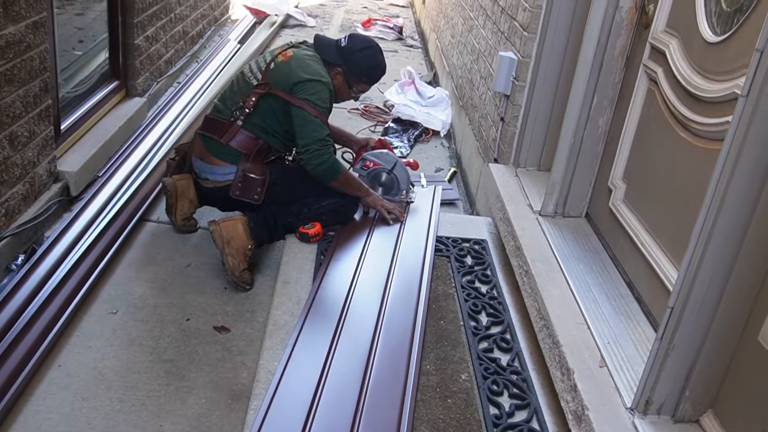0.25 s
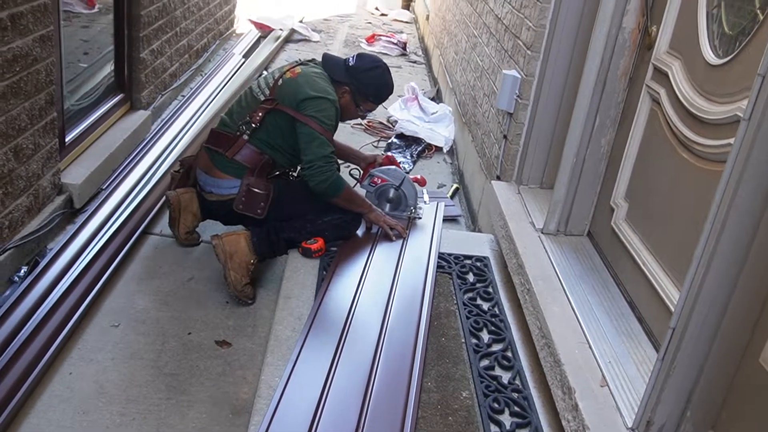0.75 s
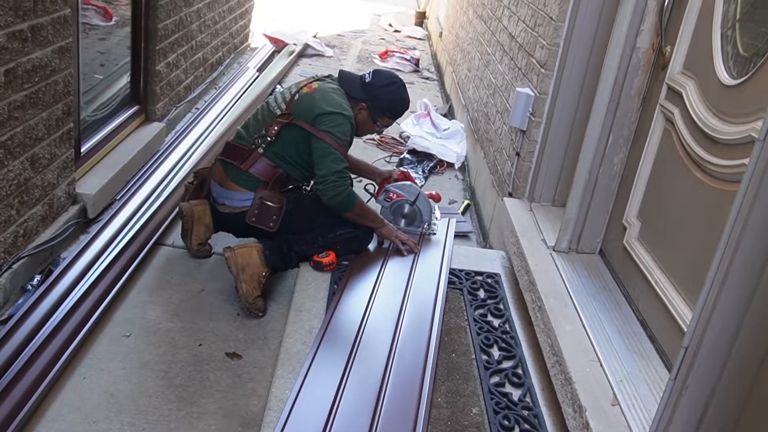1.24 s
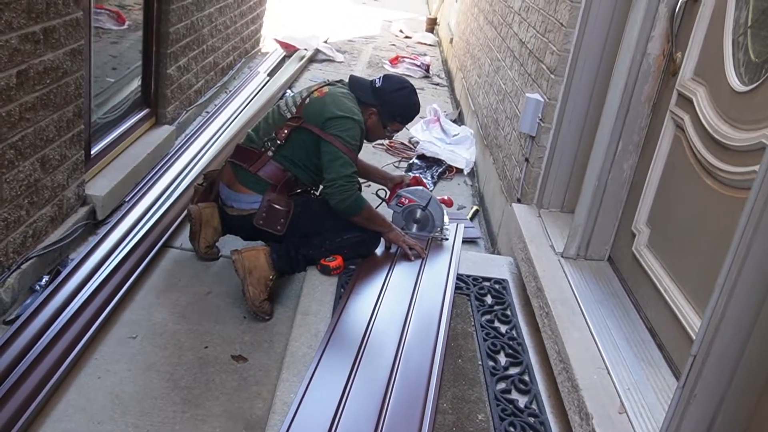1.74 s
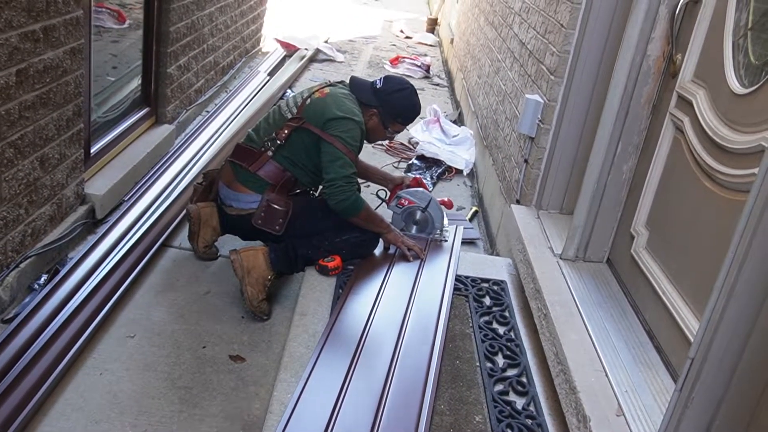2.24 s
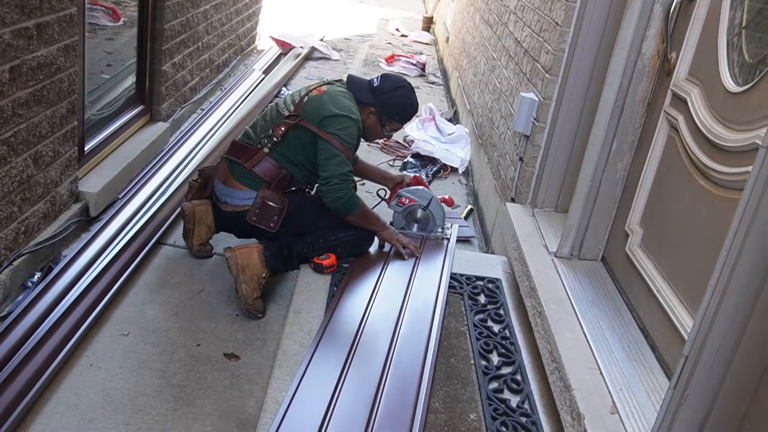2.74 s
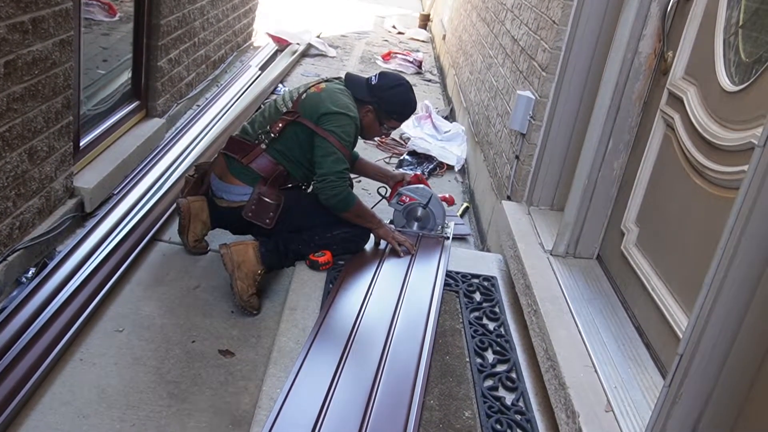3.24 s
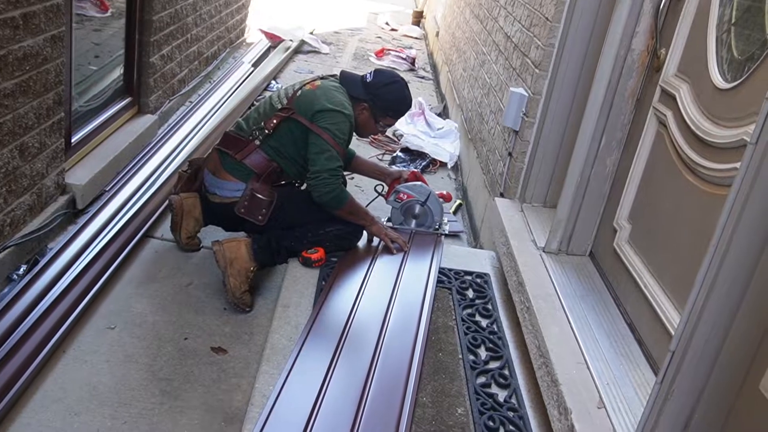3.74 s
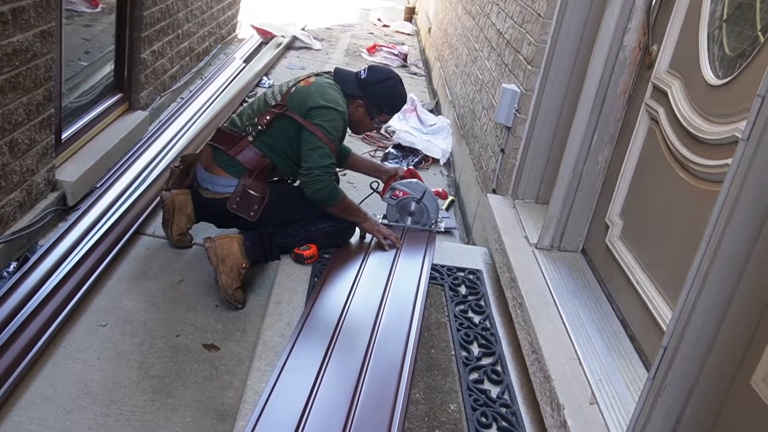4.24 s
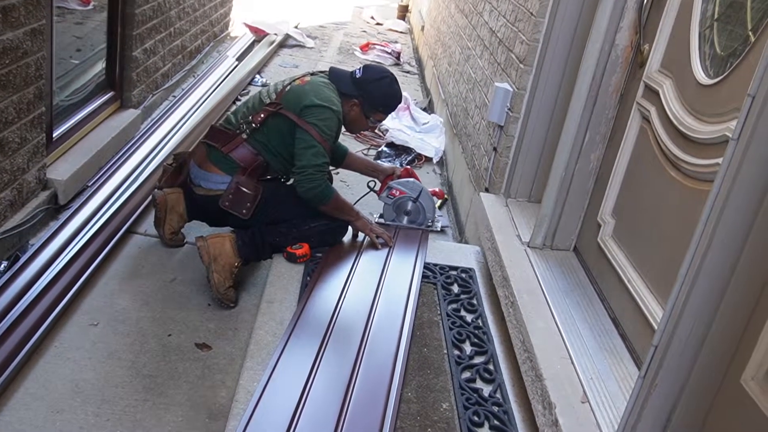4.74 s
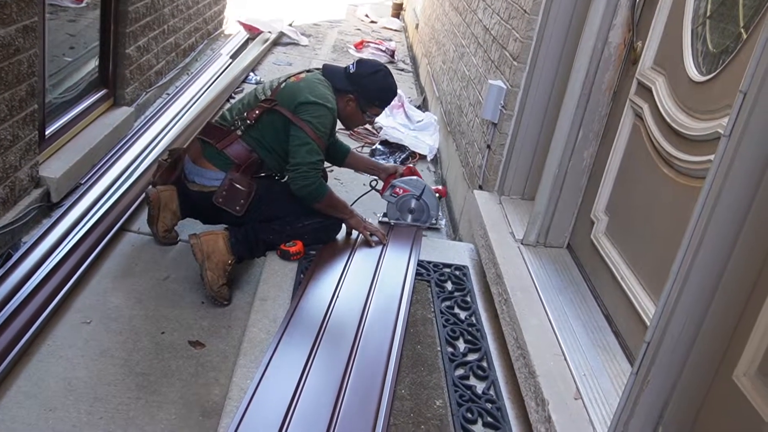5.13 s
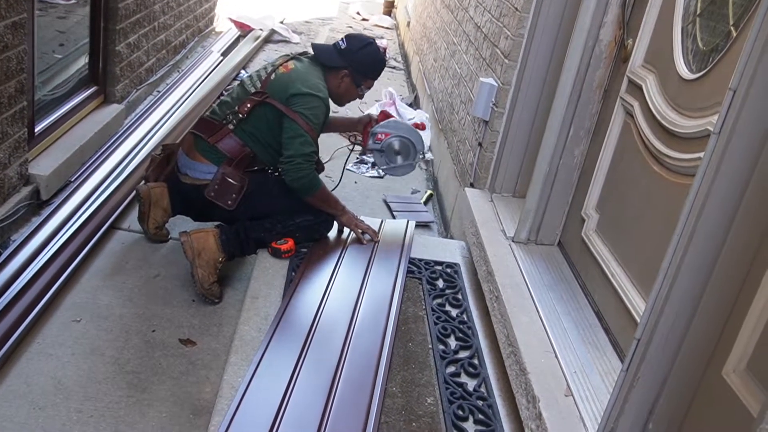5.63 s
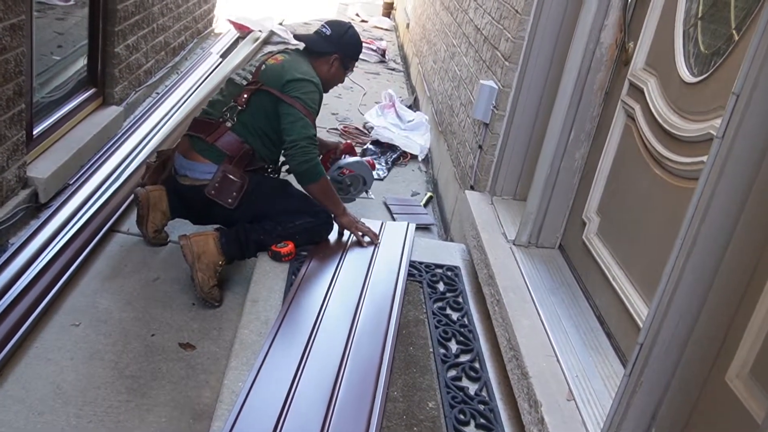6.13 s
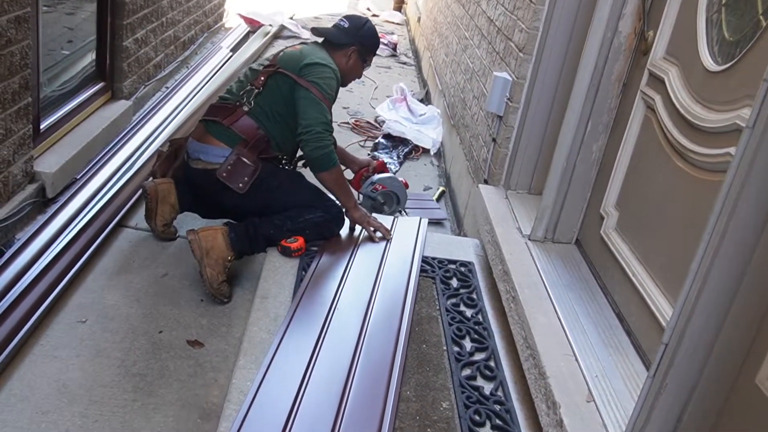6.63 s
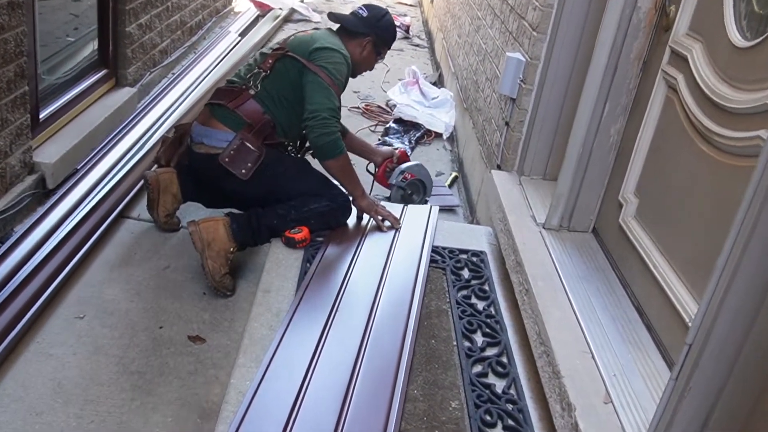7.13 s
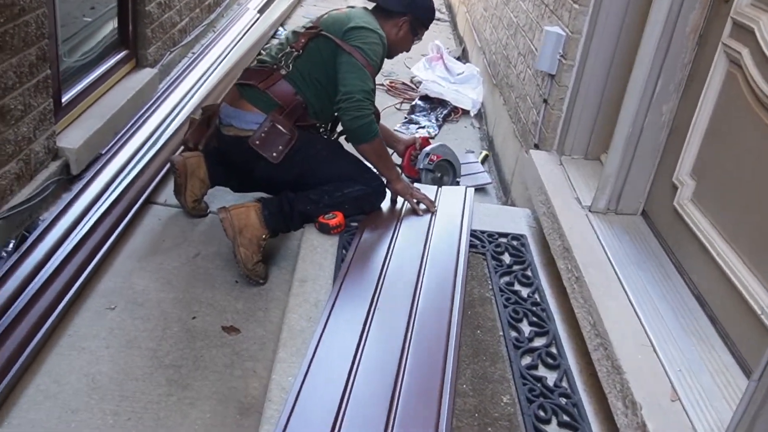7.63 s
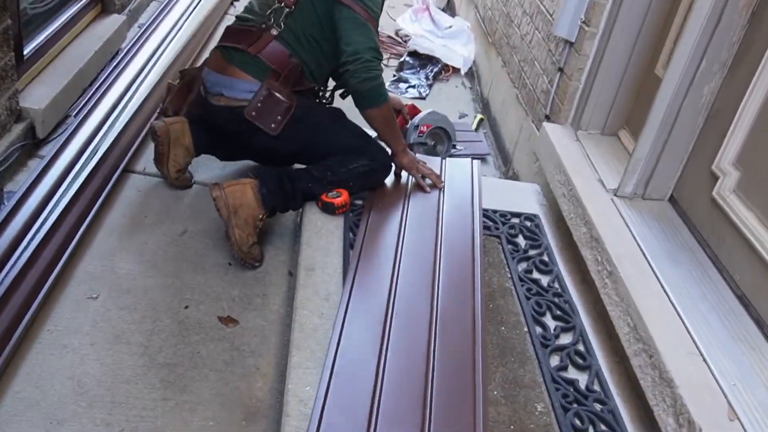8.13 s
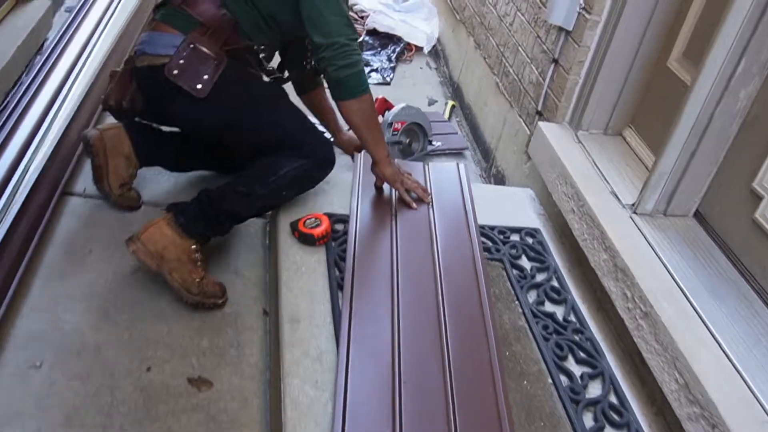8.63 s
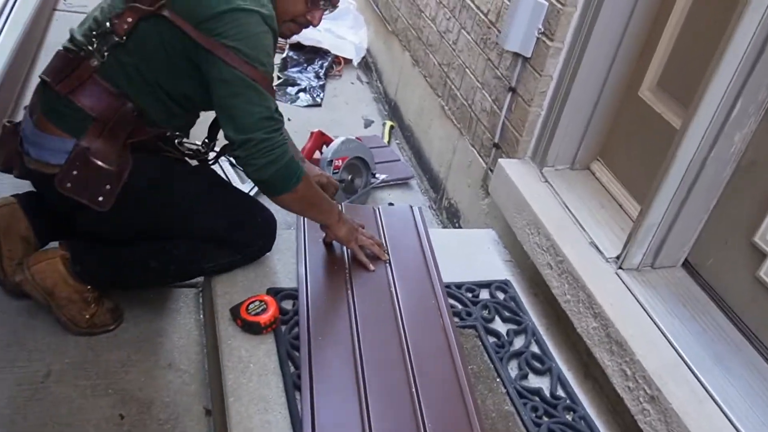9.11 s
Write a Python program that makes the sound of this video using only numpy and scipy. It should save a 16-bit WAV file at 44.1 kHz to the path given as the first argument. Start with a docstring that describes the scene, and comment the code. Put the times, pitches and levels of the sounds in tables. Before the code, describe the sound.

High, steady power saw whine with short crackly cuts into an aluminium panel, followed by a long, rattling wind-down.

```python
"""Circular saw on aluminium

A hand-held saw trims a panel on the ground in a narrow brick passage. Its gears whine over the rush
of the blade; the teeth crackle through the thin sheet, which thumps as it shifts. Then the trigger
is let go and the blade coasts down, the whine sinking and the slack gears rattling."""
import sys
import numpy as np
from scipy import signal
from scipy.fft import rfft, irfft, next_fast_len
from scipy.io import wavfile
from scipy.ndimage import uniform_filter1d, minimum_filter1d

SR = 44100
rng = np.random.default_rng(int(sys.argv[2]) if len(sys.argv) > 2 else 0)


def dump(signal):
    """Clip the signal to [-1, 1] and save it as 16-bit WAV at the path in sys.argv[1]."""
    limited = np.clip(np.atleast_2d(signal).T, -1, 1)
    pcm = np.round(limited * 32767).astype(np.int16)
    wavfile.write(sys.argv[1], SR, pcm)


N = 413207
TIME = np.arange(N) / SR
GEAR_TEETH = 70
RELEASE_S, COAST_S = 5.24, 5.36  # the motor lets go; the speed starts to fall
FRICTION_HZ_PER_S, DRAG_EVEN_HZ = 434, 3916  # air drag equals friction at DRAG_EVEN_HZ

# Table levels are relative; each layer sets its own gain.
# gear speed under power, sagging as the blade bites: time_s, mesh_hz
DRIVEN_SPEED = [(0, 4735), (.4, 4815), (1.35, 4838), (1.55, 4860), (1.85, 4860), (2.2, 4780), (2.5, 4520),
                (2.62, 4605), (2.8, 4640), (2.95, 4430), (3.1, 4445), (3.45, 4410), (3.8, 4595),
                (4.4, 4668), (4.7, 4628), (5.1, 4645), (5.3, 4844)]
# gear mesh tone under power: time_s, level_db
MESH_LEVEL = [(0, -21), (.3, -29.5), (1.3, -22.5), (2.3, -29), (3, -34.5), (3.7, -36), (4, -26), (4.3, -35),
              (4.6, -29), (5, -36), (5.25, -26)]
# its shrill octave: time_s, level_db
OCTAVE_LEVEL = [(0, -20), (.4, -24), (.8, -57), (1.5, -15), (1.75, -21.5), (2.2, -13), (2.45, -28),
                (2.65, -17), (2.97, -47), (3.1, -8.5), (3.25, -26), (3.45, -30), (3.75, -16.5), (4.05, -38),
                (4.5, -16.5), (4.8, -16), (5.2, -16)]
# gear case resonances the whine sweeps through: centre_hz, width_hz, lift_db
GEARCASE_MODES = [(14700, 250, 8), (4830, 35, -2), (4290, 64, 5), (4060, 210, 4.5), (3776, 72, 7),
                  (3540, 99, 7.5), (3280, 210, 2), (2980, 200, 3), (2520, 90, 3.5), (2222, 120, 11.5),
                  (1950, 20, 9)]
# stereo image, wider toward the treble: frequency_hz, correlation
STEREO_LIKENESS = [(30, .995), (250, .98), (600, .96), (1100, .985), (2600, .975), (4400, .92), (6000, .7),
                   (8000, .22), (15000, .18)]
# air moved by the running saw: time_s, rush_db, hiss_db
AIRFLOW = [(0.0, -18, -26), (0.62, -17.5, -25.5), (0.85, -17, -27.5), (1.13, -17.5, -26),
           (1.48, -20.5, -25.5), (1.77, -19, -25.5), (2.03, -20.5, -27.5), (2.48, -18.5, -29),
           (2.64, -21.5, -27), (2.87, -22.5, -30), (3.03, -20.5, -26.5), (3.27, -18.5, -25),
           (3.84, -18.5, -24), (4.1, -17, -25.5), (4.27, -17, -25), (4.5, -20, -26.5), (4.98, -20.5, -24),
           (5.2, -21, -28)]
# blade rush under power: frequency_hz, level_db
DRIVEN_RUSH_EQ = [(40, -87), (120, -38), (210, -15), (450, -12.5), (800, -4), (1600, -3.5), (3000, 0.5),
                  (4200, 5.5), (5000, 4), (5900, -1), (8000, -4), (11000, -44), (16000, -46)]
# fan hiss: frequency_hz, level_db
FAN_HISS_EQ = [(5000, -20.5), (8000, 1.5), (10000, 6), (11000, 2.5), (13000, 2.5), (16000, -1)]
# sizzle round the gear octave: mesh_multiple, level_db
SIZZLE_ORDERS = [(1.6, -41), (1.76, -1), (1.83, 4), (1.9, 4), (2, 11), (2.08, 1), (2.2, -49), (2.4, -60)]
# small parts radiate bass poorly: frequency_hz, level_db
SMALL_PARTS_EQ = [(120, -19.5), (700, -7)]
# motor housing and blade resonances: centre_hz, width_hz, lift_db
HOUSING_MODES = [(796, 150, 1), (1404, 290, 4), (1953, 350, 3), (3200, 72, 5.5), (3640, 280, 1),
                 (4210, 170, 1), (4570, 79, -9), (6200, 72, 6.5), (6820, 110, 6), (7500, 80, 6),
                 (8530, 50, -1), (8800, 65, 7), (13300, 250, 0)]
# narrow noise bands: saw and panel singing, and in the coast a rising colour from reflections as the saw moves:
# start_s, end_s, pitch_hz, nominal_width_hz, level_db
RINGS = [(-.2, 0.604, 396, 23, -43), (-.2, .9, 2797, 49, -31), (.4, 1.5, 2004, 130, -30),
         (.4, 1.45, 13300, 110, -36), (0.947, 1.423, 4200, 380, -23), (1.6, 2.304, 209.6, 5.6, -49),
         (2.36, 2.56, 4340, 200, -22), (3.0, 4.807, 272.4, 12, -50.5), (3.22, 3.5, 4490, 25, -23.5),
         (3.35, 3.62, 3700, 68, -22), (4.75, 5.09, 1170, 60, -31), (5.3, 5.85, 733, 120, -33.5),
         (5.65, 6.205, 803, 66, -31), (6.9, 8.105, 852, 59, -36.5), (7.7, 9.203, 944, 46, -37),
         (7.5, 9.5, 214, 15, -44), (8.76, 9.18, 1380, 50, -24.5), (8.849, 9.407, 3770, 80, -31)]
# background rumble: time_s, level_db
RUMBLE_LEVEL = [(0, -70), (5.7, -63), (7.6, -44), (8.3, -46.5), (9.37, -36)]
# its dark street tone: frequency_hz, level_db
RUMBLE_EQ = [(25, -9), (65, 2.5), (120, -2), (220, 3), (500, 2), (1200, -38)]
# the panel is bumped and shifted: start_s, level_db, decay_s
BUMPS = [(1.077, -26.5, 0.081), (1.358, -25, 0.088), (1.509, -23, 0.055), (3.71, -28, 0.068),
         (4.118, -24, .046), (4.527, -22.5, 0.028), (5.031, -22.5, 0.021), (6.428, -30, 0.14),
         (7.709, -28.5, 0.2), (8.222, -24, 0.066), (8.775, -22.5, 0.074), (9.275, -22.5, .084),
         (9.323, -22, .05)]
# its dull thump: frequency_hz, level_db
THUMP_EQ = [(30, -23), (70, -13), (140, -3), (240, 3), (400, -1), (700, -3.5), (1500, -15.5), (4000, -48)]
# the blade bites into the sheet: start_s, length_s, depth_db
BITES = [(1.356, 0.34, -30), (2.284, 0.089, -22.5), (2.427, 0.11, -19), (2.628, 0.14, -17.5),
         (2.813, 0.2, -13.5), (3.194, 0.16, -24.5), (2.982, .62, -30.5)]
# single teeth snag: time_s, strength_db
SNAGS = [(1.389, -12), (1.519, -15), (1.576, -11), (2.288, -9), (2.42, -10), (2.531, -26), (2.545, -15),
         (2.634, -3), (2.743, -8), (2.759, -6), (2.788, -9), (2.819, -27), (3.005, -12), (3.023, -4),
         (3.194, -5), (3.354, -11)]
# crackle of the thin sheet: frequency_hz, level_db
CRACKLE_EQ = [(21, -48), (35, -15), (155, 0), (325, 1.5), (414, 2.5), (493, 2), (797, 2.5), (992, 3),
              (2650, 1), (3760, -2.5), (4290, -5.5), (6500, -67), (8450, -47), (14300, -120)]
# rattle of the slack gears: time_s, level_db
RATTLE_LEVEL = [(5.4, -18), (5.56, -13.5), (5.96, -14.5), (8.28, -13.5), (9.37, -20)]
# its colour, tracking the speed: mesh_multiple, level_db
RATTLE_ORDERS = [(.15, -17.5), (.4, -23), (.62, -8), (.82, 0.5), (.95, -2), (1.12, -8.5), (1.9, -10.5),
                 (2.4, -42)]
# blade and guard resonances: centre_hz, width_hz, lift_db
BLADE_MODES = [(947, 140, 2.5), (1387, 120, 5.5), (2200, 510, 4), (3780, 430, 3.5), (5600, 80, -7),
               (6100, 130, 1.5), (6700, 140, 2), (7740, 40, 11.5), (8400, 130, 4), (15100, 400, 1)]
# rush of the coasting blade: frequency_hz, level_db
COAST_RUSH_EQ = [(30, -38), (120, -40), (210, -16), (450, -8.5), (800, 2), (1500, 5), (3000, 7.5),
                 (4500, 5), (6000, 4.5), (7200, -1.5), (8600, 3), (10300, -3), (13000, -6.5), (16000, -9.5)]
# narrow whistle two octaves above the mesh: mesh_multiple, level_db
WHISTLE_ORDERS = [(3.75, -20), (3.92, -31), (4, 22), (4.1, -33), (4.3, -7)]
# the blade's bright band, which brings out the sinking whistle: frequency_hz, level_db
BRIGHT_BAND_EQ = [(7000, -10), (7900, 0), (9900, -3), (10800, -14), (15000, -36)]
# one sharp little tick: start_s, level_db
TICK = [(8.104, -4)]
# its bright colour: frequency_hz, level_db
TICK_EQ = [(3000, -25), (8000, 2), (12000, 0), (16000, -10)]


def from_db(db):
    """Decibels to gain."""
    return 10 ** (np.asarray(db) / 20)


def rms_one(x):
    """Scale to unit power."""
    return x / np.sqrt(np.mean(x ** 2) + 1e-20)


def in_time(rows):
    """One automation curve for each column after the time."""
    times, *columns = np.transpose(rows)
    return [np.interp(TIME, times, column) for column in columns]


def at_hz(points, hz):
    """Read a curve on a log-frequency axis."""
    x, y = np.transpose(points)
    return np.interp(np.log(hz), np.log(x), y)


def lift_db(modes, hz):
    """What a set of resonances adds at a frequency."""
    return sum(lift / (1 + (2 * (hz - centre) / width) ** 2) for centre, width, lift in modes)


def drift(rate_hz):
    """Smooth random modulation of spread 1."""
    pole = np.exp(-80 * np.pi * rate_hz / SR)
    slow = signal.lfilter([1], [1, -2 * pole, pole * pole], rng.standard_normal(N // 40 + 2002))[2000:]
    return np.interp(np.arange(N) / 40, np.arange(len(slow)), rms_one(slow))


def white():
    """Two unrelated white noises."""
    return rng.standard_normal((2, N))


def coloured(pair, eq, modes=()):
    """Shape a mid and a side signal with EQ and resonances into left and right at unit power."""
    size = next_fast_len(N, real=True)
    hz = np.maximum(np.arange(size // 2 + 1) * SR / size, 1)
    alike = np.clip(at_hz(STEREO_LIKENESS, hz), 0, .999)
    mid, side = rfft(pair, size) * from_db(at_hz(eq, hz) + lift_db(modes, hz))
    side = side * np.sqrt((1 - alike) / (1 + alike))
    return rms_one(irfft([mid + side, mid - side], size)[:, :N])


def gear_speed():
    """Mesh rate in Hz: held up by the motor, then braked by even friction and square-law air drag."""
    driven, = in_time(DRIVEN_SPEED)
    start_angle = np.arctan(DRIVEN_SPEED[-1][1] / DRAG_EVEN_HZ)
    coasting = DRAG_EVEN_HZ * np.tan(start_angle - FRICTION_HZ_PER_S / DRAG_EVEN_HZ * (TIME - COAST_S))
    return np.where(TIME < COAST_S, driven, coasting)


def whine(mesh, order, level_db, flutter, wobble, apart):
    """One gear tone: it swings once a turn, and wall reflections make each side waver differently."""
    runout = wobble * np.sin(2 * np.pi * (mesh / GEAR_TEETH + rng.random()))
    jitter = 1 + flutter * (drift(20 * order) + 1j * drift(20 * order))  # widens the higher tones more
    sides = np.array([jitter + apart * (drift(4.5) + 1j * drift(0.71)) for _ in range(2)])
    tone = np.real(sides * (1 + runout) * np.exp(2j * np.pi * order * mesh))
    return from_db(level_db) * rms_one(tone)


def gears(mesh, mesh_hz, free):
    """Meshing teeth sing three harmonics: the octave leads under power, the lowest when coasting."""
    mesh_db, octave_db = in_time(MESH_LEVEL) + in_time(OCTAVE_LEVEL)
    driven_db = mesh_db, octave_db, octave_db - 19
    rise_db = 1.4 * (TIME - COAST_S)  # the overtones creep up through the coast
    coasting_db = -20.5 + 1.2 * drift(11), -33.5 + rise_db, -47 + rise_db
    first_db, second_db, third_db = (
        (1 - free) * driven + free * coasting + lift_db(GEARCASE_MODES, order * mesh_hz)
        for order, driven, coasting in zip((1, 2, 3), driven_db, coasting_db))
    blur = 1 + 3 * free  # slack teeth smear the overtones
    return (whine(mesh, order=1, level_db=first_db, flutter=.35, wobble=.25, apart=.12)
            + whine(mesh, order=2, level_db=second_db, flutter=.31 * blur, wobble=.2, apart=.5)
            + whine(mesh, order=3, level_db=third_db, flutter=.45 * blur, wobble=.35, apart=.5))


def tooth_buzz(turns, harmonics=215, size=4096):
    """Uneven teeth repeat one rough pattern on every turn of the blade: a comb of close lines."""
    lines = rng.standard_normal((2, harmonics)) + 1j * rng.standard_normal((2, harmonics))
    angle = np.arange(size) / size
    return rms_one(np.array([np.interp(turns, angle, cycle, period=1) for cycle in irfft(lines, size)]))


def geared_noise(mesh, orders, per_tooth=32):
    """Noise laid out along the rotation, so its colour rises and sinks with the speed."""
    length = next_fast_len(int(mesh[-1] * per_tooth) + 2, real=True)
    multiple = np.arange(1, length // 2 + 2) * per_tooth / length
    spectrum = rfft(rng.standard_normal((2, length))) * from_db(at_hz(orders, multiple))
    return np.array([np.interp(mesh * per_tooth, np.arange(length), n) for n in irfft(spectrum, length)])


def driven_saw(mesh, bite, throb=0.074):
    """Blade rush and fan hiss, partly locked to the rotation, with a sizzle round the gear octave."""
    rush_db, hiss_db = in_time(AIRFLOW)
    turns = mesh / GEAR_TEETH
    rush = coloured(white() + 0.17 * tooth_buzz(turns), DRIVEN_RUSH_EQ, HOUSING_MODES)
    rush *= from_db(rush_db + 1.7 + 1.24 * drift(26))
    hiss = coloured(white() + 0.097 * tooth_buzz(turns), FAN_HISS_EQ, HOUSING_MODES)
    hiss *= from_db(hiss_db + 8 + 1.5 * drift(7.4))
    sizzle = coloured(geared_noise(mesh, SIZZLE_ORDERS), SMALL_PARTS_EQ, HOUSING_MODES)
    sizzle *= from_db(-20.5 - 4 * np.minimum(bite, 1) + 2.2 * drift(4.7))  # ducks under load
    return (rush + hiss + sizzle) * (1 + throb * np.sin(2 * np.pi * turns))


def passage(pair, wet=.19, sway_s=.00007, spread_s=.000062, echoes=7):
    """Early reflections off walls and ground: a comb colour that shifts as the saw moves."""
    out = pair.copy()
    for delay_s, pan in rng.uniform([.004, -1], [.03, 1], (echoes, 2)):
        path_s = delay_s + sway_s * drift(0.24)
        out += wet * np.array([np.interp(TIME - path_s - side * pan * spread_s, TIME, channel, left=0)
                               for side, channel in zip((-1, 1), pair)])
    return out / np.sqrt(1 + echoes * wet ** 2)


def rings(fade_s=0.15):
    """Narrow noise bands swell in and fade out: saw or panel singing while rubbing, and a colour from
    reflections that rises as the saw moves."""
    out = np.zeros(N)
    for start, end, hz, width, db in RINGS:
        on = (TIME > start) & (TIME < end)
        t = TIME[on]
        swell = np.minimum(np.minimum(t - start, end - t) / fade_s, 1)
        band = signal.butter(2, [hz - .6 * width, hz + .6 * width], "band", fs=SR, output="sos")
        out[on] += from_db(db) * swell * rms_one(signal.sosfilt(band, rng.standard_normal(len(t))))
    return out


def rumble(bite, boom_db=-48):
    """A faint low bed that grows near the end and swells as the sheet booms with each bite."""
    bed_db, = in_time(RUMBLE_LEVEL)
    return (from_db(bed_db) + from_db(boom_db) * bite) * coloured(white(), RUMBLE_EQ)


def panel_thumps(attack_s=0.00396, taps_per_s=250):
    """The long sheet clatters dully on the ground: a knock, then a short flurry of taps."""
    envelope = np.zeros(N)
    taps = (rng.random(N) < taps_per_s / SR) * np.sign(white())
    for start, db, decay_s in BUMPS:
        age = np.maximum(TIME - start, 0)
        decay = np.exp(-np.minimum(age / decay_s, 20))
        envelope += from_db(db - 4) * (1 - np.exp(-age / attack_s)) * decay
        taps[0, round((start + 2 * attack_s) * SR)] += 2.3  # the leading knock
    return envelope * coloured(taps + 0.037 * white(), THUMP_EQ)


def bite_depth(full_bite_db=-20.5, arch=0.47):
    """The teeth sink into the sheet and ease out along a flattened arch; 1 is a full bite."""
    depth = np.zeros(N)
    for start, length, db in BITES:
        on = (TIME > start) & (TIME < start + length)
        depth[on] += from_db(db - full_bite_db) * np.sin(np.pi * (TIME[on] - start) / length) ** arch
    return depth


def cut_crackle(mesh, bite, chips_per_s=900, spread_db=5, runout=1.3, ceiling=.55):
    """Teeth tear off chips: clicks bunched once a turn, thicker and more even in a deep bite."""
    bunching = runout / (.5 + bite)
    contact = np.exp(bunching * np.cos(2 * np.pi * mesh / GEAR_TEETH)) / np.i0(bunching)
    chips = (rng.random(N) < chips_per_s * bite * contact / SR) * np.sqrt(bite)
    clicks = chips * from_db(spread_db * np.clip(white(), -2, 1.5)) * rng.choice([-1, 1], (2, N))
    for start, db in SNAGS:
        clicks[0, round(start * SR)] += from_db(db + 21.5)
    crackle = from_db(-24.5) * coloured(clicks, CRACKLE_EQ)
    return ceiling * np.tanh(crackle / ceiling)  # the loudest cracks are flattened


def coasting_saw(mesh, throb=0.077):
    """Unloaded teeth rattle in their play, ringing blade and guard over a rush and a thin whistle."""
    rattle_db, = in_time(RATTLE_LEVEL)
    turns = mesh / GEAR_TEETH
    rattle = coloured(geared_noise(mesh, RATTLE_ORDERS), SMALL_PARTS_EQ, BLADE_MODES)
    rattle *= from_db(rattle_db - 3 + 1.4 * drift(13))
    rush = coloured(white() * from_db(1.7 * drift(190)), COAST_RUSH_EQ, BLADE_MODES)
    rush *= from_db(-16 + .5 * drift(25))
    whistle = coloured(geared_noise(mesh, WHISTLE_ORDERS), BRIGHT_BAND_EQ)
    whistle *= from_db(-37 + 2.5 * drift(12))
    return (rattle + rush + whistle) * (1 + throb * np.sin(2 * np.pi * turns))


def tick(decay_s=0.011):
    """A brief bright contact as the saw is set down."""
    (start, db), = TICK
    envelope = (TIME > start) * np.exp(-np.minimum(abs(TIME - start) / decay_s, 20))
    return from_db(db - 9) * envelope * coloured(white(), TICK_EQ)


def scene(crossfade_s=0.18, slack_lag_s=0.06):
    """One rotation drives the whole saw; the motor lets go, and a moment later the gears fall slack."""
    mesh_hz, bite = gear_speed(), bite_depth()
    mesh = np.cumsum(mesh_hz) / SR  # gear teeth passed so far
    free, slack = (np.clip((TIME - centre_s) / crossfade_s + .5, 0, 1)
                   for centre_s in (RELEASE_S, RELEASE_S + slack_lag_s))
    saw_noise = np.sqrt(1 - free) * driven_saw(mesh, bite) + np.sqrt(slack) * coasting_saw(mesh)
    saw = gears(mesh, mesh_hz, free) + passage(saw_noise)
    return saw + rings() + cut_crackle(mesh, bite) + panel_thumps() + tick() + rumble(bite)


def record(dry, low_cut_hz=38, high_cut_hz=15800, hold_samples=129):
    """Master chain: a low cut, a fast limiter on the rare highest peaks, then a steep high cut."""
    thinned = signal.sosfilt(signal.butter(2, low_cut_hz, "high", fs=SR, output="sos"), dry)
    allowed = 1 / np.maximum(np.abs(thinned).max(axis=0), 1)
    gain = uniform_filter1d(minimum_filter1d(allowed, hold_samples), hold_samples)
    return signal.sosfilt(signal.ellip(12, .1, 80, high_cut_hz, fs=SR, output="sos"), thinned * gain)


dry = scene()
out = record(dry)
dump(out)
```